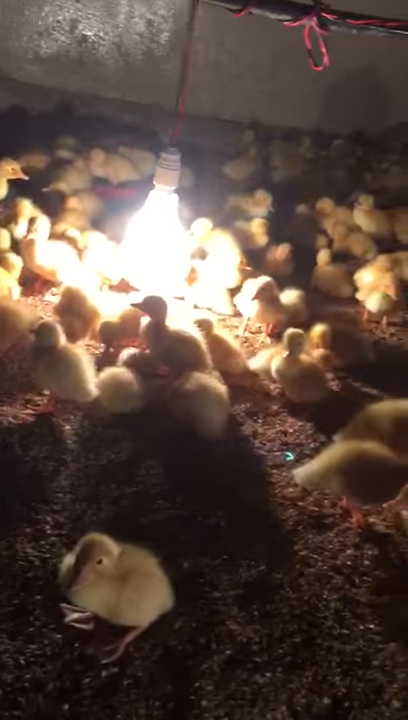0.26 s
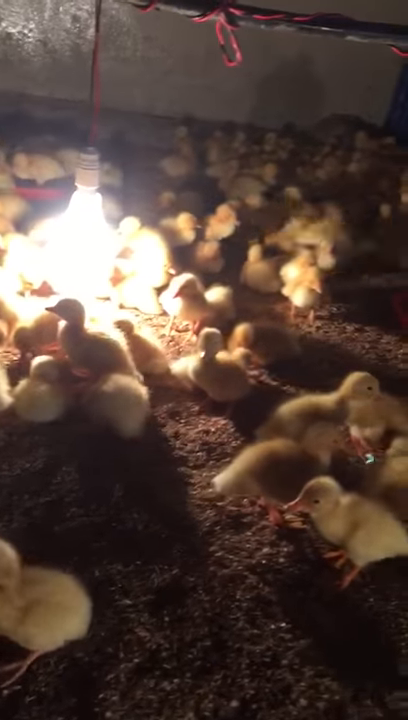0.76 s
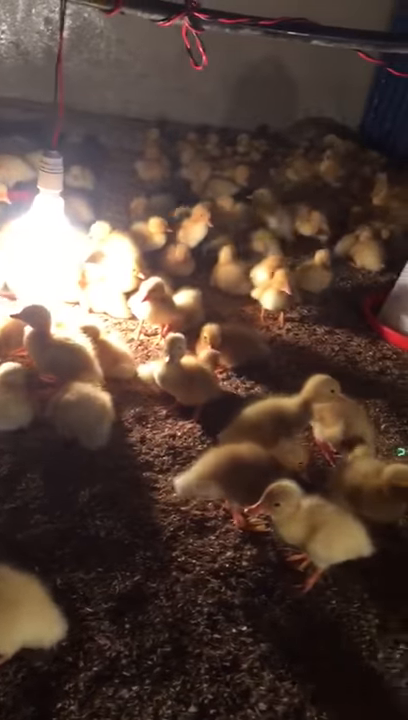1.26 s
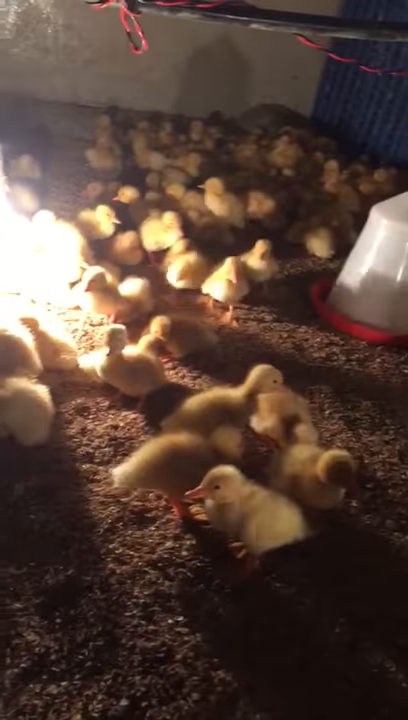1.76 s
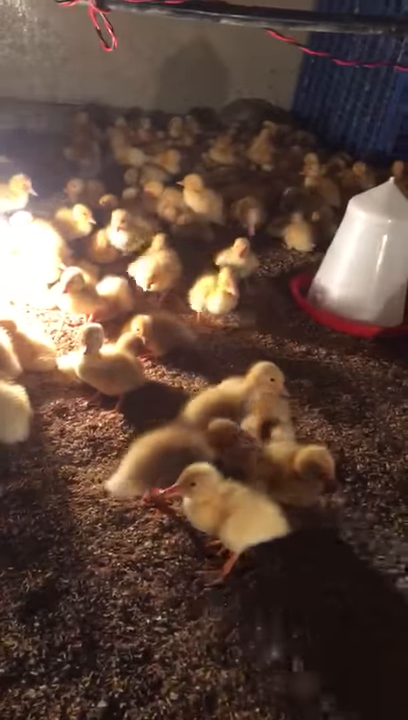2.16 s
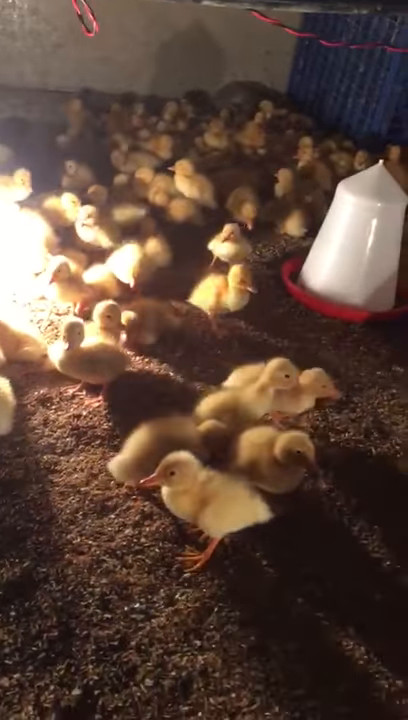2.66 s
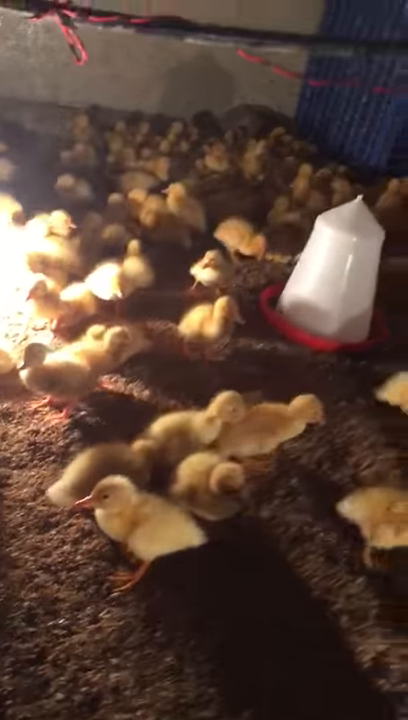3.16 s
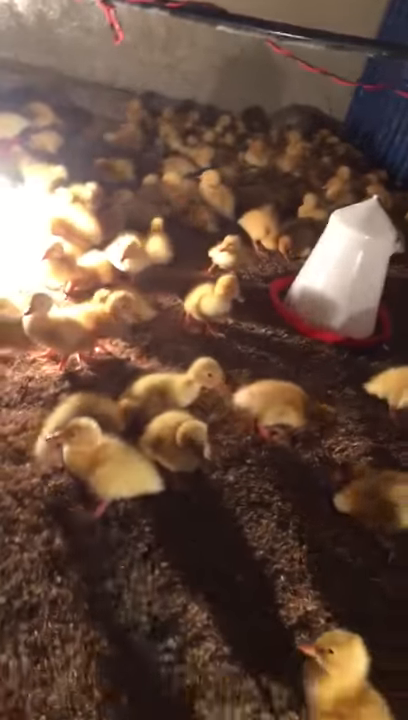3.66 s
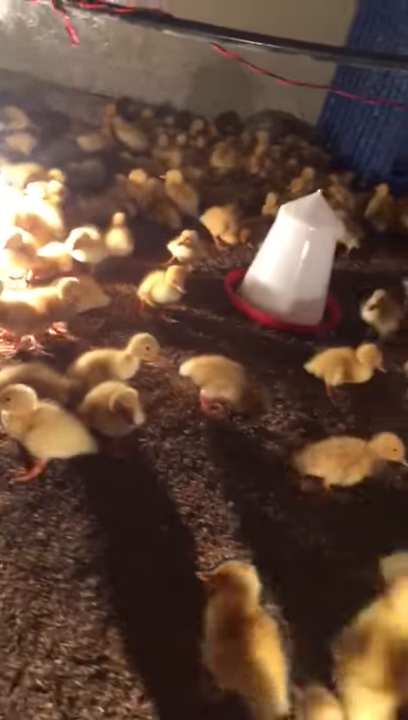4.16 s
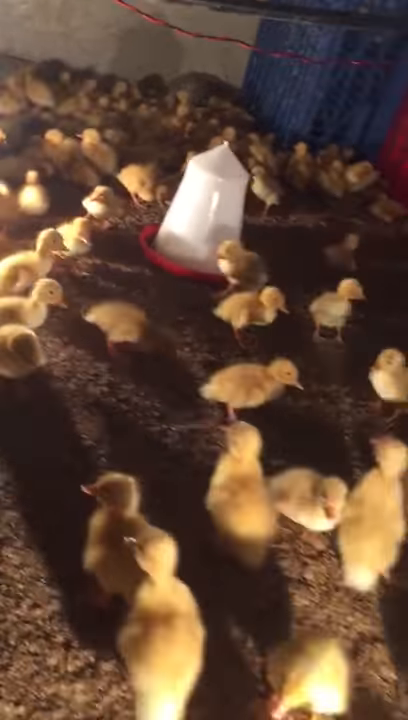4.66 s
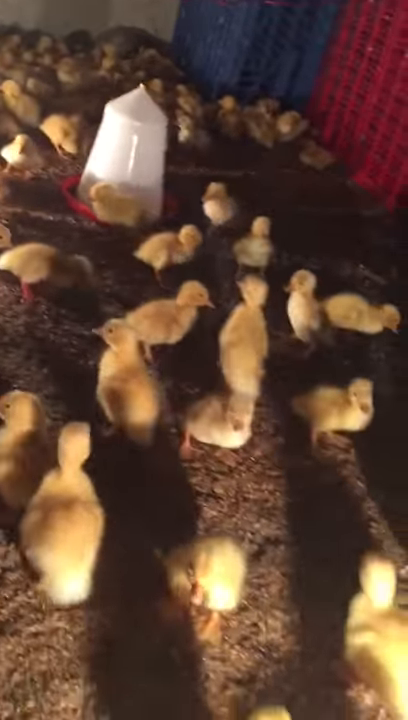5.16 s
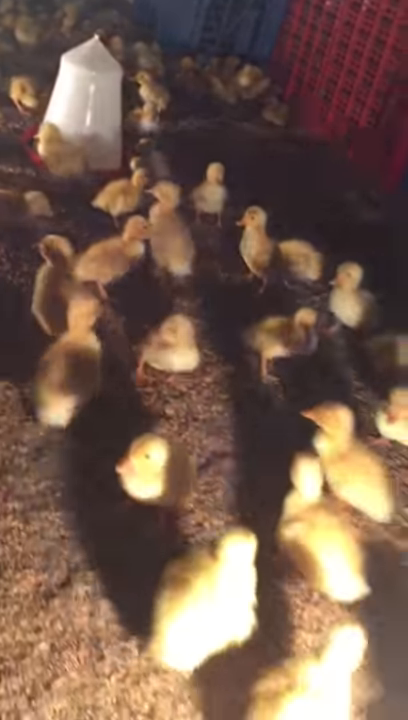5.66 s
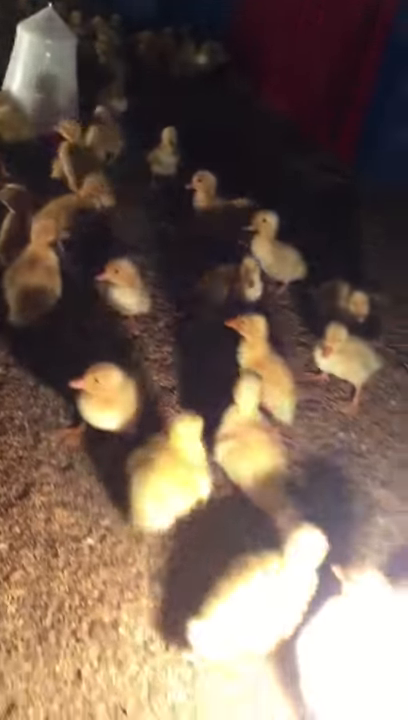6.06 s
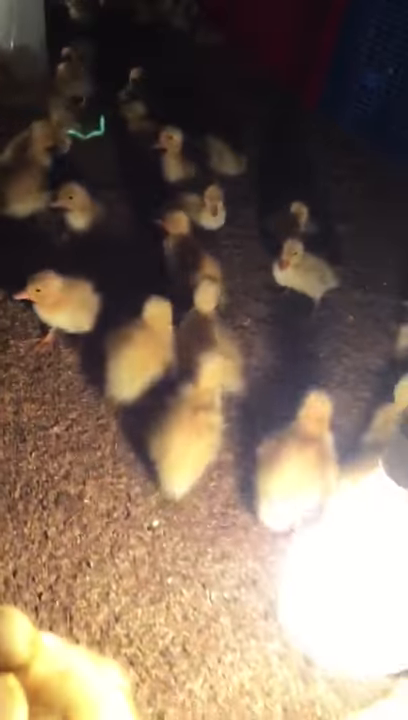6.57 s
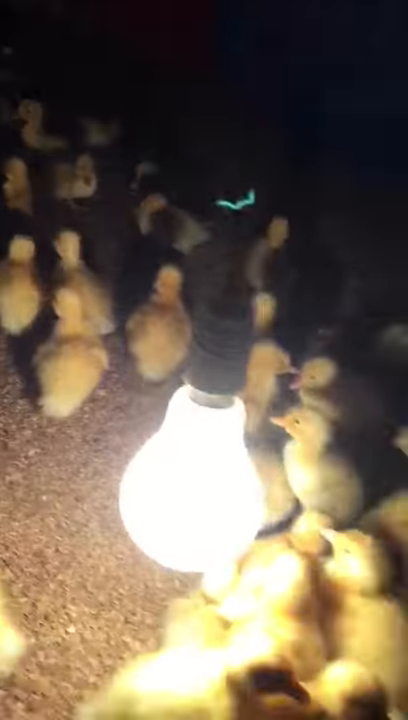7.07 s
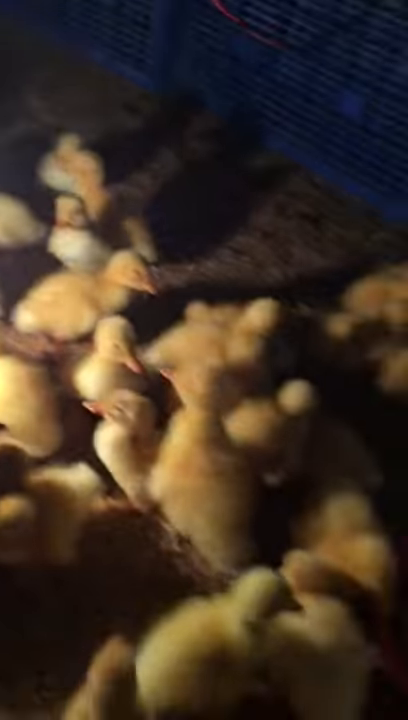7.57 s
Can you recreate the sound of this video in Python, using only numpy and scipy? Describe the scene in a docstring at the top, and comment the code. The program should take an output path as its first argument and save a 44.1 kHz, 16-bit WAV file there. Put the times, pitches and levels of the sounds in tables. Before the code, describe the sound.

Bright, quick duckling peeps ring out close by while many more twitter behind, with ticks, floor scuffs and a faint electrical hum.

```python
"""Near ducklings peep in a walled brooder: unsteady sines with weak overtones trace U-shaped peeps and falling notes.
The rest of the brood twitters behind them, built from many scattered notes, each layer with its echo.
Shaped noise makes rustling litter, ticks, scuffing steps and shuffling feet; there are low hum swells and one dead tap.
Hoarse poultry cries and a faint drone come from far off, over the shed's rumble, 120 Hz hum and hiss."""
import sys
import numpy as np
from scipy import signal
from scipy.fft import rfft, irfft, next_fast_len
from scipy.io import wavfile
from scipy.ndimage import map_coordinates

SR = 44100
rng = np.random.default_rng(int(sys.argv[2]) if len(sys.argv) > 2 else 0)


def pcm_store(signal):
    """Save signal as 16-bit PCM."""
    levels = np.round(np.clip(np.atleast_2d(signal), -1, 1) * 32767)
    wavfile.write(sys.argv[1], SR, levels.astype(np.int16).T)


N = 343980

# Peeps of the nearest birds. Each row: time of the pitch top in seconds, length in seconds, top in Hz,
# settling time in seconds, held pitch in Hz, end hook in Hz, level in dB before trim, voice name.
NEAR_PEEPS = [(-.075, .088, 4300, .03, 4130, 0, -23, "full"),
              (.136, .075, 4450, .015, 3680, 150, -31, "shrill"),
              (.224, .05, 4450, .025, 4170, 0, -21, "full"), (.298, .025, 4260, .02, 4130, 0, -21, "soft"),
              (.413, .085, 4680, .011, 3840, 60, -22.5, "shrill"),
              (.534, .098, 4390, .026, 4100, 0, -16.5, "full"),
              (.703, .09, 4650, .013, 3880, 190, -23, "shrill"),
              (.853, .078, 4310, .026, 4120, 20, -16.5, "full"),
              (1, .086, 4500, .016, 3770, 230, -26.5, "shrill"),
              (1.177, .089, 4350, .022, 4140, 0, -18.5, "full"),
              (1.495, .075, 4250, .022, 4060, 50, -18.5, "full"),
              (1.59, .075, 4220, .02, 4130, 0, -31, "full"), (1.885, .075, 4200, .03, 3880, 0, -37, "full"),
              (2.11, .072, 4520, .024, 3920, 40, -28.5, "shrill"),
              (2.19, .085, 4200, .015, 3920, 40, -32.5, "soft"),
              (2.39, .093, 4600, .013, 3970, 90, -31, "shrill"),
              (2.471, .012, 4080, .02, 4020, 0, -23.5, "soft"),
              (2.506, .084, 4300, .014, 3990, 50, -31.5, "soft"),
              (2.672, .093, 4730, .024, 4100, 200, -23.5, "shrill"),
              (2.824, .096, 4300, .018, 3920, 80, -32.5, "soft"),
              (2.96, .091, 4690, .018, 4080, 320, -23, "shrill"),
              (3.138, .094, 4350, .013, 3900, 180, -29.5, "soft"),
              (3.252, .091, 4720, .018, 4020, 300, -23.5, "shrill"),
              (3.45, .092, 4380, .013, 3970, 140, -29, "soft"),
              (3.567, .085, 4620, .013, 3990, 50, -28, "shrill"),
              (3.764, .095, 4330, .012, 3980, 70, -30.5, "soft"),
              (3.859, .086, 4660, .021, 4150, 0, -25, "shrill"),
              (4.09, .09, 4250, .015, 3990, 190, -28, "soft"),
              (4.153, .087, 4650, .015, 4120, 260, -22.5, "shrill"),
              (4.41, .094, 4280, .014, 3970, 240, -28, "soft"),
              (4.44, .085, 4720, .017, 4260, 270, -22, "shrill"),
              (4.721, .099, 4230, .014, 3980, 100, -32, "soft"),
              (4.736, .083, 4820, .016, 4550, 260, -22, "shrill"),
              (5.032, .085, 4760, .019, 4420, 150, -24, "shrill"),
              (5.042, .1, 4230, .015, 4040, 70, -36, "soft"),
              (5.31, .08, 4350, .015, 4080, 80, -39, "shrill"),
              (5.338, .076, 4700, .03, 4430, 110, -26, "shrill"),
              (5.354, .1, 4230, .015, 4010, 60, -37, "soft"),
              (5.624, .087, 4620, .013, 4050, 0, -23.5, "shrill"),
              (5.678, .095, 4200, .015, 4020, 0, -37, "soft"),
              (5.916, .09, 4680, .012, 4010, 90, -24.5, "shrill"),
              (6.004, .1, 4200, .015, 3960, 50, -38, "soft"),
              (6.227, .091, 4650, .013, 4050, 130, -23.5, "shrill"),
              (6.33, .1, 4200, .015, 4000, 70, -36, "soft"),
              (6.571, .076, 4620, .019, 4080, 110, -26, "shrill"),
              (6.797, .084, 4230, .016, 3960, 110, -29, "soft"),
              (6.872, .086, 4650, .012, 4040, 0, -26, "shrill"),
              (7.089, .088, 4210, .028, 4050, 10, -26, "soft"),
              (7.245, .07, 4600, .015, 4000, 70, -21.5, "shrill"),
              (7.366, .094, 4290, .026, 4100, 40, -23.5, "soft"),
              (7.558, .077, 4780, .028, 4310, 10, -26, "shrill"),
              (7.652, .099, 4300, .035, 4170, 0, -26, "full")]
# Ways of peeping, by voice name. Each entry: lead before the pitch top in seconds, half the level rise over the peep
# in dB, scale of the closing plunge in Hz, overtone level in dB before trim, echo in dB relative to the call.
PEEP_VOICES = {"full": (.026, -2.5, 300, -59, -12.5), "shrill": (.01, -.8, 1500, -70, -10.5),
               "soft": (.012, .3, 600, -53, -10)}
# Soft falling notes. Each row: time of the pitch top in seconds, length in seconds, top in Hz, end in Hz,
# level in dB before trim.
FALLING_NOTES = [(.258, .092, 3880, 2920, -27), (.575, .092, 3900, 3000, -26), (.82, .062, 3750, 3200, -38),
                 (.876, .082, 3950, 3020, -25.5), (1.115, .06, 3700, 3280, -37),
                 (1.212, .084, 3900, 3020, -25), (1.415, .052, 3960, 3450, -37),
                 (1.605, .08, 3650, 2950, -41), (1.715, .06, 4020, 3300, -37.5),
                 (1.875, .11, 3650, 3150, -36), (2.015, .065, 4150, 3380, -35),
                 (2.19, .07, 3750, 3100, -33), (2.505, .07, 3450, 3030, -42.5),
                 (2.685, .085, 3750, 2500, -46), (3.005, .05, 3780, 3100, -42),
                 (3.07, .06, 3500, 2600, -44), (3.352, .06, 3750, 3050, -42),
                 (3.735, .045, 3650, 3050, -46), (4.315, .055, 2830, 2400, -44),
                 (4.415, .07, 3650, 2600, -42), (4.56, .04, 3650, 3200, -45), (4.715, .08, 3850, 2650, -38),
                 (5.28, .06, 3400, 2850, -47), (5.485, .05, 3400, 2780, -46), (6.205, .05, 3150, 2550, -45),
                 (6.46, .04, 3600, 3200, -42), (6.5, .04, 3300, 2600, -44), (6.645, .085, 3650, 2830, -41),
                 (6.83, .05, 3600, 2850, -44), (6.96, .09, 3800, 3050, -40), (7.095, .045, 3620, 2950, -40),
                 (7.19, .06, 3300, 2500, -45), (7.26, .08, 3850, 3000, -41), (7.345, .055, 3850, 3400, -40),
                 (7.53, .08, 3650, 2380, -41), (7.61, .055, 3950, 3350, -43), (7.75, .07, 3700, 3050, -36)]
# Low, hoarse notes from the back of the pen. Each row: time in seconds, length in seconds, level in dB before trim,
# mid pitch in Hz.
HOARSE_NOTES = [(0.567, 0.074, -41.5, 2267), (1.271, 0.039, -46.5, 2180), (1.328, 0.083, -44, 2254),
                (1.456, 0.15, -42.5, 2258), (2.429, 0.034, -42.5, 2117), (2.58, 0.086, -40.5, 2033),
                (3.228, 0.055, -45, 2276), (3.784, 0.056, -43.5, 2277), (4.197, 0.043, -42.5, 2033),
                (4.682, 0.051, -43.5, 2510), (5.107, 0.035, -44, 2130), (5.305, 0.061, -42.5, 2280),
                (5.435, 0.067, -45, 2336), (5.872, 0.043, -44.5, 1956), (6.069, 0.18, -48, 2006),
                (6.82, 0.092, -44.5, 2230), (7.053, 0.075, -44, 2403), (7.738, 0.024, -40, 1746)]
# Decay of the shed's echo. Each row: frequency in Hz, t60 in seconds.
ECHO_T60 = [(200, 0.097), (2000, 0.34), (4200, 0.36), (8000, 0.26), (12000, 0.077)]
# Birds stirring the bedding. Each row: time of the peak in seconds, half length in seconds, level in dB before trim.
LITTER_STIRS = [(0.046, 0.16, -52.5), (0.291, 0.037, -48.5), (0.662, 0.049, -52), (1.344, 0.27, -66.5),
                (1.918, 0.36, -55.5), (2.09, 0.034, -52), (2.54, 0.026, -61), (4.11, 0.11, -61.5),
                (4.513, 0.12, -61.5), (4.766, 0.047, -48.5), (5.292, 0.46, -68.5), (7.293, 0.046, -56),
                (7.54, 0.036, -62), (7.79, 0.11, -60)]
# Relative spectrum of the rustle. Each row: frequency in Hz, density in dB per Hz.
RUSTLE_SPECTRUM = [(1000, -13.5), (3000, -16.5), (5500, 16.5), (7000, 18.5), (9000, 16), (11000, 9.5),
                   (11800, 8.5), (12500, -21)]
# Ticks in the litter. Each row: time in seconds, level in dB before trim, knock in dB relative to it before trim.
LITTER_TICKS = [(0.0643, -23.5, -40), (0.1358, -32.5, -45), (0.4438, -35.5, -27), (1.276, -28, -32),
                (1.3679, -36, -3), (1.746, -26.5, -5), (2.2959, -19, -40), (2.3723, -25, -18),
                (2.5471, -33.5, -6.5), (4.017, -32.5, -18), (4.189, -22.5, -27), (4.668, -36.5, -24),
                (5.3287, -41.5, 4), (5.853, -39, 1.5), (7.263, -33.5, -8)]
# One dead tap: time in seconds, frequency in Hz, half length in seconds, peak in dB.
DEAD_TAP = (.0896, 1130, .0007, -13)
# Low hum swells near 120 Hz. Each row: start in seconds, frequency in Hz, t60 in seconds, level in dB.
HUM_SWELLS = [(4.769, 118.2, 0.75, -28), (4.798, 84, 1, -33.5), (4.991, 106.6, 0.63, -35),
              (5.14, 113.4, 0.91, -39), (5.459, 127, 0.8, -37.5)]
# Steps and scuffs on the floor. Each row: start in seconds, scrape t60 in seconds, scrape centre in Hz,
# scrape half width in octaves, scrape level in dB, thud level in dB.
FLOOR_SCUFFS = [(1.38, 0.55, 497, 1.3, -45.5, -44.5), (3.64, 0.96, 615, 0.89, -42.5, -47),
                (3.79, 1, 330, 2.1, -44, -44.5), (4.12, 0.63, 292, 0.73, -43.5, -54),
                (4.315, 0.39, 238, 0.55, -44, -50.5), (4.372, 0.45, 300, 0.47, -42.5, -50),
                (4.62, 0.57, 290, 0.63, -48.5, -52), (4.78, 0.38, 300, 1.2, -68, -44.5),
                (4.999, 0.51, 260, 0.36, -44, -49), (5.451, 0.98, 625, 1.8, -40.5, -40),
                (6.178, 0.91, 1020, 0.64, -38, -63.5), (6.359, 1, 1074, 0.66, -43, -62),
                (7.25, 0.54, 474, 1.95, -31.5, -43), (7.306, 0.68, 377, 1.2, -37, -44)]
# Far poultry. Each row: start in seconds, length in seconds, start in Hz, end in Hz, level in dB before trim.
POULTRY_CRIES = [(0.823, 0.15, 899, 936, -48.5), (0.933, 0.14, 1058, 1092, -50.5),
                 (1.134, 0.066, 1258, 1016, -42.5), (3.729, 0.14, 1406, 1395, -43.5),
                 (3.892, 0.13, 1390, 1440, -46), (6.064, 0.079, 1958, 1884, -42.5),
                 (6.199, 0.1, 1226, 1254, -48), (6.349, 0.085, 1288, 1253, -43.5),
                 (7.563, 0.12, 1133, 1131, -45)]
# The far drone: start in seconds, length in seconds, level in dB before the gain of each line.
DRONE_EVENT = (1.78, 0.79, -56)
# Lines of the drone. Each row: frequency in Hz, level in dB relative to the drone level.
DRONE_PARTIALS = [(991, -2.5), (1373, -0.5), (1561, 1), (1793, 1), (2169, 1)]
# Shuffling of feet. Each row: time in seconds, level in dB before trim.
FEET_LEVEL = [(0.0, -48), (0.65, -54.5), (0.93, -50), (2.0, -48), (3.48, -53), (3.73, -49), (6.95, -53.5),
              (7.45, -47.5), (7.8, -52.5)]
# Relative spectrum of the shuffling. Each row: frequency in Hz, density in dB per Hz.
FEET_SPECTRUM = [(120, -36), (250, -1.5), (450, -7), (800, -8), (1300, -10), (1700, -11.5), (3000, -13),
                 (4550, -4), (5300, -38)]
# Relative spectrum of the rumble. Each row: frequency in Hz, density in dB per Hz.
RUMBLE_SPECTRUM = [(25, -39.5), (40, -16.5), (60, -4), (80, -2.5), (120, -5), (170, -7), (280, -17),
                   (600, -50)]
# Relative spectrum of the hiss. Each row: frequency in Hz, density in dB per Hz.
HISS_SPECTRUM = [(3000, -13), (5200, -21), (6500, -7.5), (8500, -2), (11000, -1.5), (12500, -15.5)]

TOP_HZ = 12600  # band limit
SLIDE_BEND = .85  # exponent below 1: a falling note is steepest a little before the middle of its fall
SLIDE_DULLS = 0.3  # dB of overtone lost, relative to the note, for each dB that it is fainter
SLIDE_WETTER = 0.36  # dB more echo, relative to the note, for each dB that it is fainter
BILL_HZ = 7000  # resonance that lights up the overtone of a falling note
ARCH_S = .026  # lead of a falling note before its pitch top


def amp(db):
    """Decibels to gain."""
    return 10 ** (np.asarray(db) / 20)


def unit(x):
    """x at rms 1."""
    return x / np.sqrt(np.mean(x ** 2) + 1e-20)


def along(points, hz):
    """Interpolate (Hz, value) points on a log axis."""
    f, v = np.transpose(points)
    return np.interp(np.log(hz + 1), np.log(f + 1), v)


def curves(rows):
    """One value per sample for each column after the time."""
    s, *cols = np.transpose(rows)
    return [np.interp(np.arange(N) / SR, s, c) for c in cols]


def wobble(t, rate_hz):
    """A smooth random curve over the times t, rate_hz knots a second."""
    at = (t - t[0]) * rate_hz
    return map_coordinates(rng.standard_normal(int(at[-1]) + 4), [at], mode="nearest")


def filtered(x, response):
    """x times a response of frequency."""
    size = next_fast_len(len(x) + 8192)
    spectrum = rfft(x, size) * response(np.fft.rfftfreq(size, 1 / SR))
    return irfft(spectrum, size)[:len(x)]


def coloured(x, spectrum):
    """x shaped by the given spectrum, at rms 1."""
    return unit(filtered(x, lambda hz: amp(along(spectrum, hz))))


def band(size, centre_hz, octaves):
    """Noise of rms 1 in a bell around a centre."""
    def bell(hz):
        return np.exp(-(np.log2((hz + 1) / centre_hz) / octaves) ** 2)
    return unit(filtered(rng.standard_normal(size), bell))


def add(track, s, sound):
    """Mix a sound into the track at a time, cropped to the track."""
    start = round(s * SR)
    part = sound[max(-start, 0):max(len(track) - start, 0)]
    track[max(start, 0):][:len(part)] += part


def ramp(u):
    """A smooth step from 0 to 1."""
    return np.sin(np.pi / 2 * np.clip(u, 0, 1)) ** 2


def whistle(t, hz, overtone_db, waver=0.0048, third_db=-14, shimmer_db=1):
    """The syrinx: a nearly pure, slightly unsteady tone with two weak overtones."""
    phase = 2 * np.pi * np.cumsum(hz * (1 + waver * wobble(t, 255.7))) / SR
    overtones = np.sin(2 * phase) + amp(third_db) * np.sin(3 * phase)
    tone = np.sin(phase) + amp(overtone_db) * overtones
    return np.sqrt(2) * amp(shimmer_db * wobble(t, 152.3)) * tone


def peep(length_s, top_hz, trough_hz, settle_s, hook_hz, swell_db, overtone_db, lead_s, plunge_hz,
         sag=1.307, plunge_s=0.0135):
    """Pitch shoots up during the lead, sags into a trough, hooks upward and plunges as the bill closes."""
    t = np.arange(-lead_s, length_s + plunge_s, 1 / SR)
    drop_hz = top_hz - trough_hz
    hz = trough_hz + drop_hz * np.exp(-(np.maximum(t, 0) / settle_s) ** sag)
    hz += hook_hz * np.exp(-((t - length_s) / plunge_s) ** 2)
    hz -= 0.6 * drop_hz * (np.minimum(t, 0) / lead_s) ** 2
    hz -= plunge_hz * ramp((t - length_s) / (1.3 * plunge_s))

    closing = ramp((t[-1] - t) / 0.005) * amp(-850 * np.maximum(t - length_s, 0))
    swell = amp(2 * swell_db * (t / length_s - .5))
    effort = ramp((t + lead_s) / 0.019) * swell * closing
    thinning_db = -10 * ramp((hz - 4700) / 450)  # the voice thins above its throat resonance
    brightness_db = overtone_db - 12 * ramp(abs(hz - trough_hz) / 700)  # overtones peak on the held pitch
    brightness_db -= 6 * (1 - ramp(t / 0.022))  # and grow as the bill opens
    return effort * amp(thinning_db) * whistle(t, hz, brightness_db)


def slide(length_s, top_hz, end_hz, overtone_db, arch_s, hook_hz=110, arch_db=-8, drop_s=.012, off_bill_db=-9):
    """A relaxed note that arches over its top, swells as it falls, levels off, hooks and drops steeply."""
    t = np.arange(-arch_s, length_s + drop_s, 1 / SR)
    u = np.clip(t / length_s, 0, 1)
    hz = top_hz - (top_hz - end_hz) * ramp(u ** SLIDE_BEND)
    hz -= 280 * (np.minimum(t, 0) / arch_s) ** 2
    hz += hook_hz * np.exp(-((t - length_s) / drop_s) ** 2)
    hz -= 900 * np.clip((t - length_s) / drop_s, 0, 1) ** 2

    swell = amp(arch_db * (1 - ramp(u / 0.22)) - 6.8 * u ** 2)
    effort = ramp((t + arch_s) / arch_s) * ramp((t[-1] - t) / 0.013) * swell
    brightness_db = overtone_db + off_bill_db * ramp(abs(2 * hz - BILL_HZ) / 900)
    return effort * whistle(t, hz, brightness_db)


def walls(x, reach_s=.022, count=7):
    """A few early reflections, which make a held note beat."""
    out = np.zeros(len(x) + SR // 10)
    for when, size in rng.uniform(-0.91, 1, (count, 2)):
        add(out, reach_s * (.6 + .5 * when), size * np.sqrt(3 / count) * x)
    return out


def echo(x):
    """The shed's answer from one spot: a diffuse random tail, longest at 2 to 4 kHz, short in bass and top treble."""
    hz, t, z = signal.stft(rng.standard_normal(SR // 2), SR, nperseg=256)
    decay = amp(-60 * t / along(ECHO_T60, hz)[:, None])
    tail = signal.istft(z * decay * ramp(t / 0.0068), SR, nperseg=256)[1]
    return signal.fftconvolve(x, tail / np.linalg.norm(tail))


def near_birds(peep_db=-1.32, slide_db=1.46, walls_db=-16, slide_room_db=-14.5, slide_overtone_db=-23):
    """Peeps and falling notes, each call with its own echo as from its own spot."""
    out = np.zeros(N)
    for s, length_s, top_hz, settle_s, held_hz, hook_hz, db, voice in NEAR_PEEPS:
        lead_s, swell_db, plunge_hz, overtone_db, room_db = PEEP_VOICES[voice]
        # subtracting db keeps a voice's overtone level from peep to peep
        call = peep(length_s, top_hz, held_hz, settle_s, hook_hz, swell_db, overtone_db - db, lead_s, plunge_hz)
        call = amp(db + peep_db) * call
        add(out, s - lead_s, call)
        add(out, s - lead_s, amp(walls_db) * walls(call))
        add(out, s - lead_s, amp(room_db) * echo(call))

    loudest_db = max(row[-1] for row in FALLING_NOTES)
    for s, length_s, top_hz, end_hz, db in FALLING_NOTES:
        fainter_db = loudest_db - db
        overtone_db = slide_overtone_db - SLIDE_DULLS * fainter_db
        call = amp(db + slide_db) * slide(length_s, top_hz, end_hz, overtone_db, ARCH_S)
        add(out, s - ARCH_S, call)
        add(out, s - ARCH_S, amp(slide_room_db + SLIDE_WETTER * fainter_db) * echo(call))
    return out


def far_peeps(trough_hz=4040, scatter_hz=190, direct=1.1, count=170):
    """The back of the brood: many overlapping peeps of random pitch and level, with a strong shared echo."""
    out = np.zeros(N)
    for k, (when, size, loud) in enumerate(2 * rng.random((count, 3)) - 1):
        hz = trough_hz + scatter_hz * size
        call = peep(0.077, hz + 330, hz, 0.01743, 100, 0, -40.5, 0.01298, 600)
        add(out, (k + when) / count * N / SR - .1, amp(6.3 * loud) * call)
    return unit(direct * out + echo(out)[:N])


def twitter(start_hz, spread, fall, length_s, direct, count):
    """Many falling notes of random time, pitch, length and level, with a shared echo."""
    out = np.zeros(N)
    for k, (when, size, long, drop, loud) in enumerate(2 * rng.random((count, 5)) - 1):
        hz = start_hz * (1 + spread * size)
        end_hz = hz * (fall + .09 * drop)
        note = slide(length_s * (1 + 0.443 * long), hz, end_hz, -39.0, ARCH_S, hook_hz=0)
        add(out, (k + 2 * when) / count * N / SR, amp(4.6 * loud) * note)
    return unit(direct * out + echo(out)[:N])


def low_notes(level_db=-4, fall=0.23, rough=.06, direct=0.79):
    """Farther birds drop into a hoarse, low note: a fast-wavering tone with an echo almost as strong."""
    out = np.zeros(N)
    for s, length_s, db, mid_hz in HOARSE_NOTES:
        t = np.arange(0, length_s + 0.016, 1 / SR)
        hz = mid_hz * (1 + fall * (.5 - t / t[-1]))
        effort = amp(db + level_db) * ramp(t / 0.0048) * ramp((t[-1] - t) / 0.016)
        note = effort * whistle(t, hz, -20.0, waver=rough)
        add(out, s - .015, direct * note)
        add(out, s - .015, 0.74 * echo(note))
    return out


def brood(peeps_db=-42.0, high_db=-50.0, low_db=-51.0):
    """The evenly busy crowd: far peeps, bright twitter, a lower murmur and hoarse notes."""
    high = twitter(start_hz=3700, spread=0.14, fall=.8, length_s=0.041, direct=1.3, count=100)
    low = twitter(start_hz=2618, spread=.2, fall=.8, length_s=0.048, direct=1.3, count=120)
    return amp(peeps_db) * far_peeps() + amp(high_db) * high + amp(low_db) * low + low_notes()


def litter(rustle_db=1, calm_db=-86, tick_db=-8.5, knock_db=-1, tick_t60_s=0.041, knock_t60_s=0.11, room_db=-10):
    """Dry bedding rustles in tiny noise grains as birds stir it; single bits tick and knock on the floor."""
    clock = np.arange(N) / SR
    grains = rng.standard_normal(N) * amp(2.5 * wobble(clock, 700) + 4.0 * wobble(clock, 70))
    stirring = amp(calm_db + 11.0 * wobble(clock, 17))
    for s, half_s, db in LITTER_STIRS:
        stirring = stirring + amp(db + rustle_db) * np.exp(-((clock - s) / half_s) ** 2)

    ticks, t = np.zeros(N), np.arange(SR // 10) / SR
    for s, db, body_db in LITTER_TICKS:
        crack = amp(tick_db - 60 * t / tick_t60_s) * band(len(t), 6500, 0.7)
        knock = amp(knock_db + body_db - 60 * t / knock_t60_s) * band(len(t), 900, 0.99)
        add(ticks, s - .001, amp(db - 3.5) * ramp(t / 0.00023) * (crack + knock))
    return stirring * coloured(grains, RUSTLE_SPECTRUM) + ticks + amp(room_db) * echo(ticks)[:N]


def dead_tap(room_db=-15):
    """A cosine inside a very short bell, with a faint echo."""
    s, hz, half_s, db = DEAD_TAP
    u = np.arange(N) / SR - s
    tap = amp(db) * np.exp(-(u / half_s) ** 2) * np.cos(2 * np.pi * hz * u)
    return tap + amp(room_db) * echo(tap)[:N]


def hum_swells():
    """Low sines near 120 Hz that rise quickly, ring and fade exponentially."""
    out, t = np.zeros(N), np.arange(SR) / SR
    for s, hz, t60_s, db in HUM_SWELLS:
        add(out, s, amp(db - 60 * t / t60_s) * ramp(t / 0.012) * np.sin(2 * np.pi * hz * t))
    return out


def scuffs(thud_hz=105, thud_t60_s=1.35, rise=.026):
    """Steps: a gritty decaying band of noise with a thud in the floor."""
    out, t = np.zeros(N), np.arange(SR) / SR
    for s, t60_s, centre_hz, octaves, db, thud_db in FLOOR_SCUFFS:
        scrape = amp(db - 60 * t / t60_s + 2.0 * wobble(t, 110)) * band(len(t), centre_hz, octaves)
        thud = amp(thud_db - 60 * t / thud_t60_s) * band(len(t), thud_hz, 0.94)
        add(out, s, ramp(t / (rise * t60_s)) * (scrape + thud))  # a longer scuff starts more gently
    return out


def far_poultry(rough=0.038, level_db=-2):
    """Hoarse cries: wavering tones on a straight pitch glide, blurred by a strong echo."""
    out = np.zeros(N)
    for s, length_s, start_hz, end_hz, db in POULTRY_CRIES:
        t = np.arange(0, length_s, 1 / SR)
        effort = amp(db + level_db) * ramp(t / 0.026) * ramp((length_s - t) / 0.016)
        cry = effort * whistle(t, np.linspace(start_hz, end_hz, len(t)), -19.0, waver=rough)
        add(out, s, 1.01 * cry)
        add(out, s, 0.78 * echo(cry))
    return out


def far_drone(waver=0.0069):
    """A faint far buzz of several slightly unsteady tones swells and fades."""
    s, length_s, db = DRONE_EVENT
    out, t = np.zeros(N), np.arange(0, length_s, 1 / SR)
    swell = amp(db) * ramp(t / 0.073) * ramp((length_s - t) / 0.48)
    for hz, line_db in DRONE_PARTIALS:
        add(out, s, amp(line_db) * swell * whistle(t, hz, -40, waver=waver))
    return out


def shed(rumble_db=-50.5, shuffle_db=3.5, hum_db=-56, hiss_db=-85):
    """Low rumble, a 120 Hz mains hum, a faint hiss and the shuffle of many webbed feet as flickering noise."""
    t = np.arange(N) / SR
    rumble = amp(rumble_db + 1.0 * wobble(t, 2.5)) * coloured(rng.standard_normal(N), RUMBLE_SPECTRUM)
    patter = rng.standard_normal(N) * amp(2.0 * wobble(t, 90))
    feet = amp(curves(FEET_LEVEL)[0] + shuffle_db + wobble(t, 11)) * coloured(patter, FEET_SPECTRUM)
    hiss = amp(hiss_db) * coloured(rng.standard_normal(N), HISS_SPECTRUM)
    hum = amp(hum_db + 0.7 * wobble(t, 2.7)) * np.sin(2 * np.pi * 120 * t)
    return rumble + feet + hiss + hum


def scene():
    """Everything at one microphone."""
    birds = near_birds() + brood()
    floor = litter() + dead_tap() + scuffs()
    background = hum_swells() + far_poultry() + far_drone() + shed()
    return (birds + floor + background)[None]


def record(dry):
    """Remove everything from the band limit upward."""
    return np.array([filtered(channel, lambda hz: hz < TOP_HZ) for channel in dry])


dry = scene()
out = record(dry)
pcm_store(out)
```